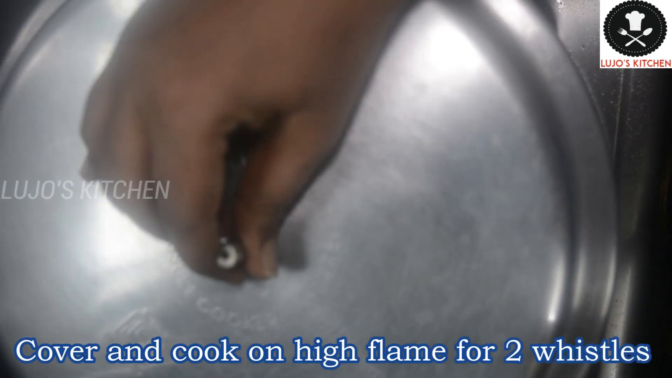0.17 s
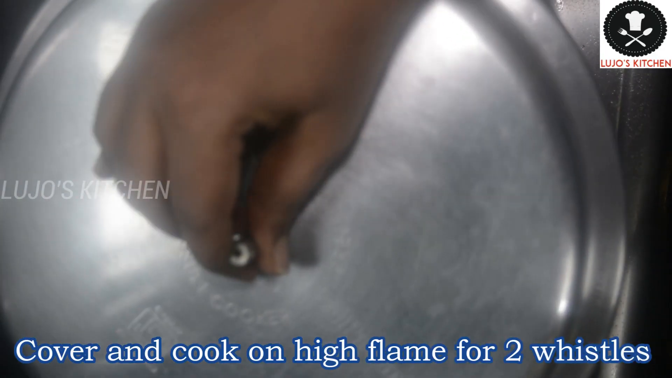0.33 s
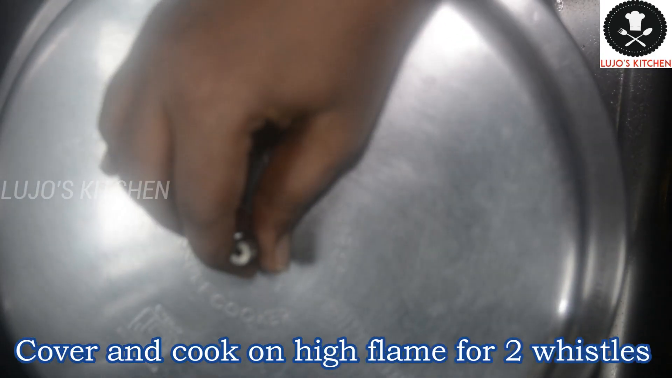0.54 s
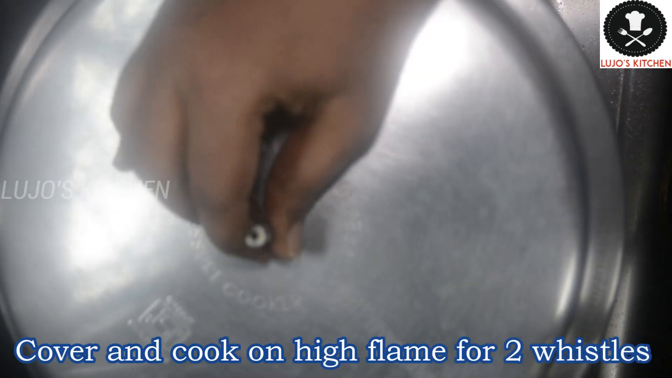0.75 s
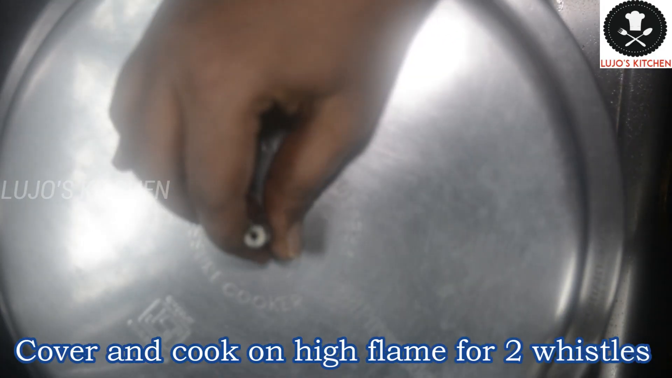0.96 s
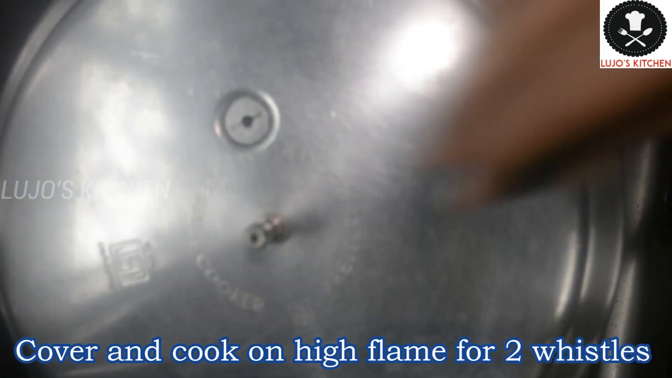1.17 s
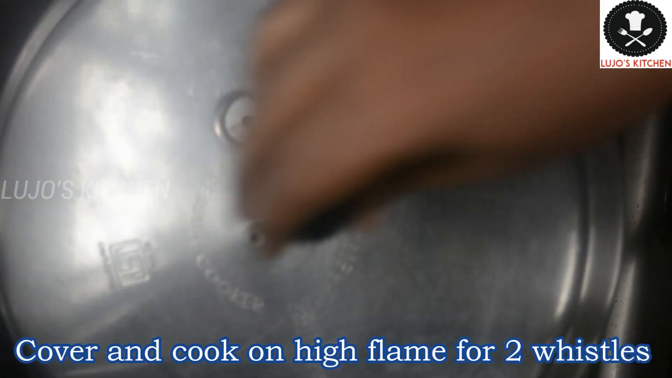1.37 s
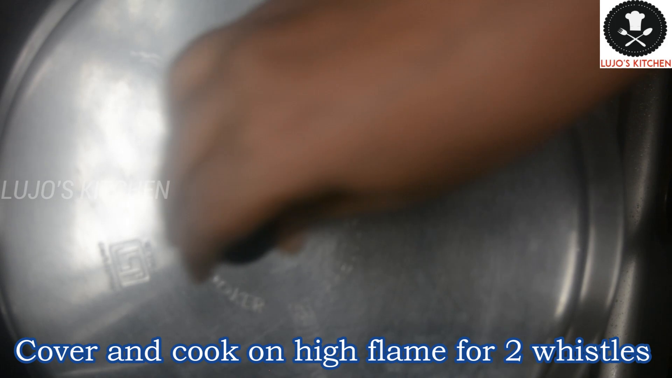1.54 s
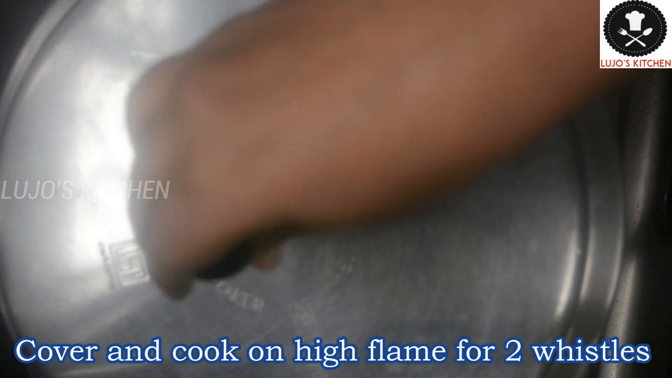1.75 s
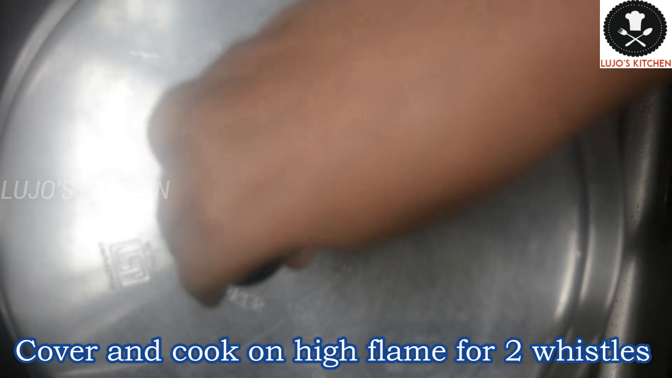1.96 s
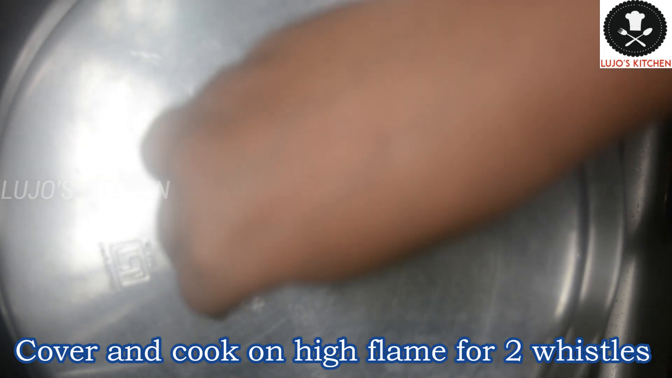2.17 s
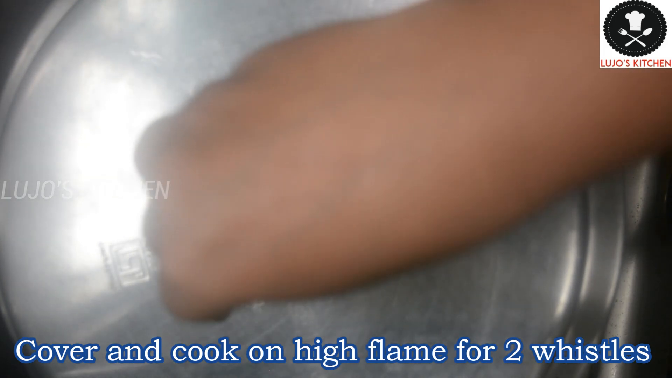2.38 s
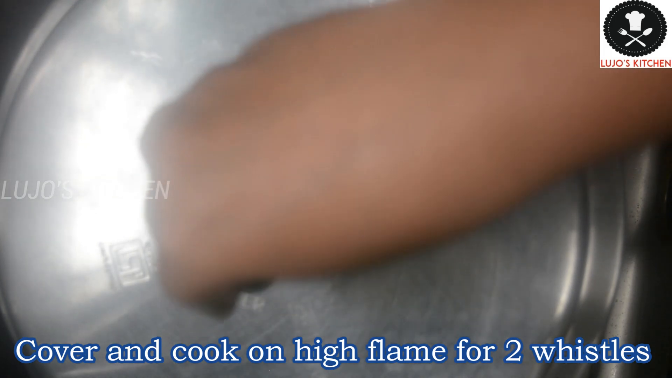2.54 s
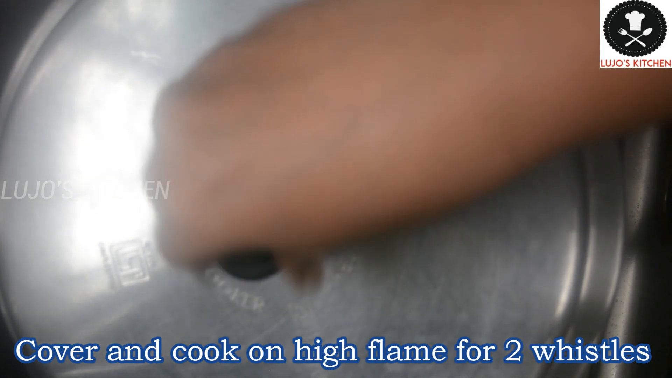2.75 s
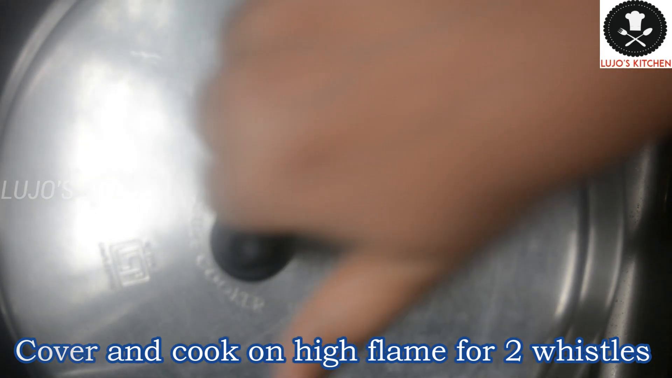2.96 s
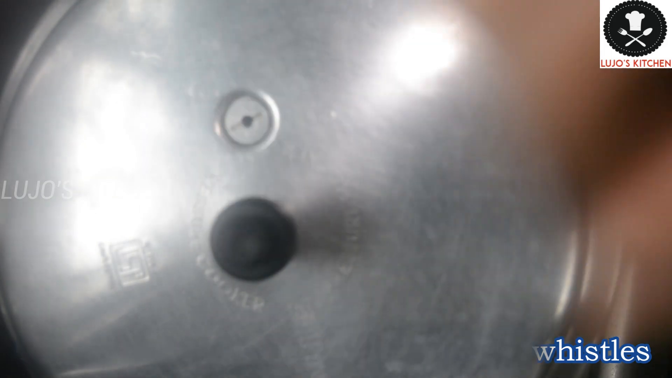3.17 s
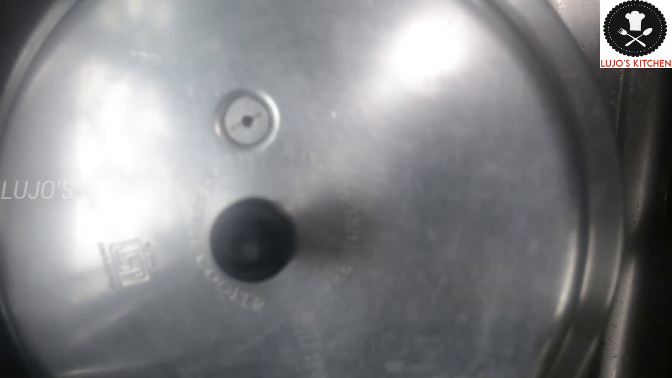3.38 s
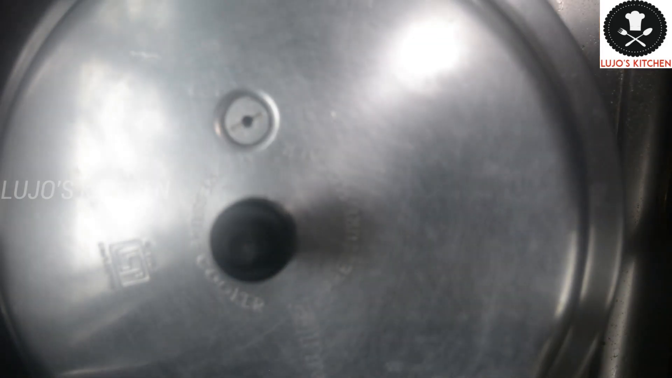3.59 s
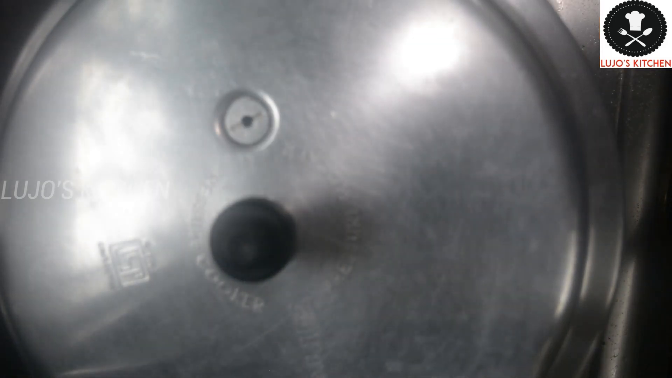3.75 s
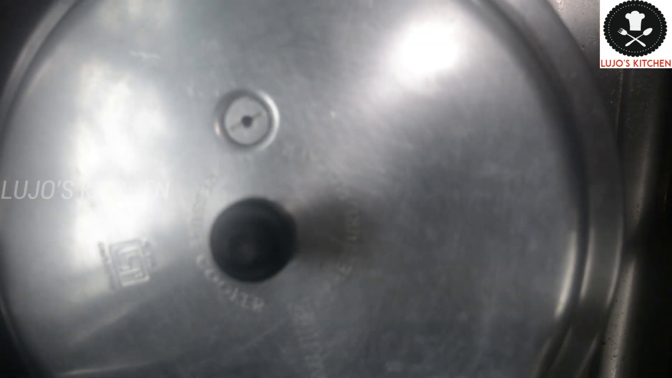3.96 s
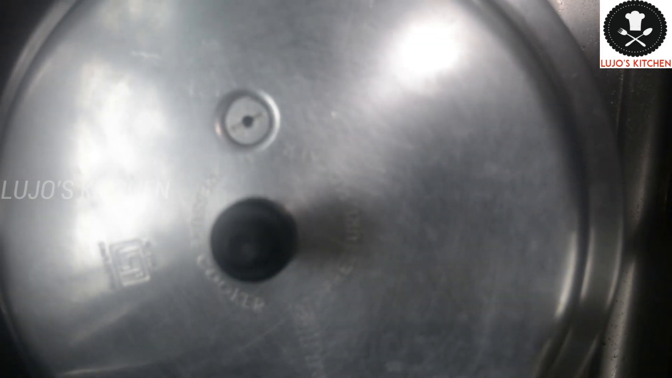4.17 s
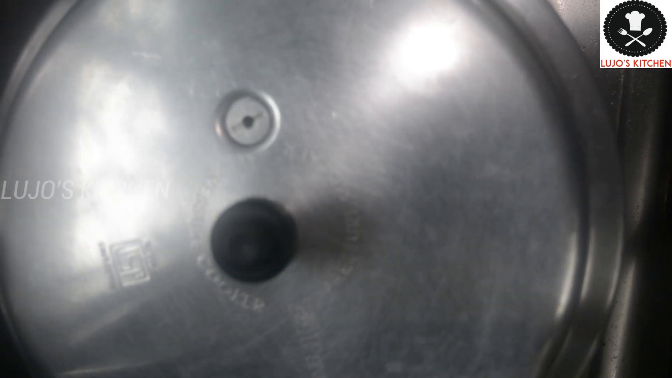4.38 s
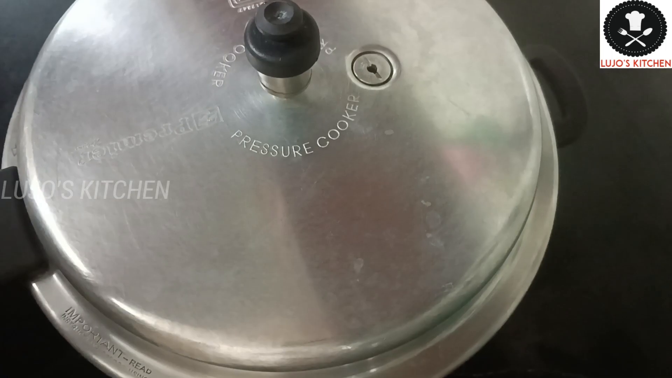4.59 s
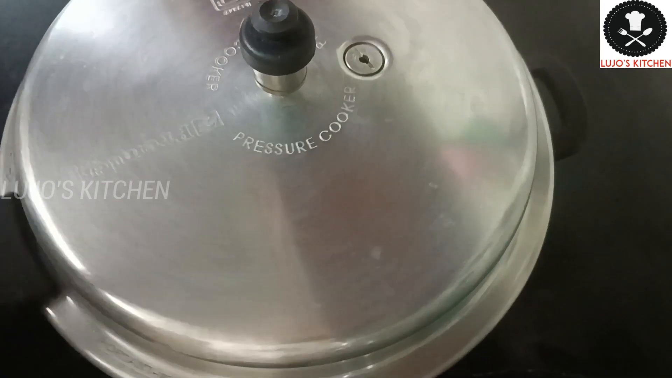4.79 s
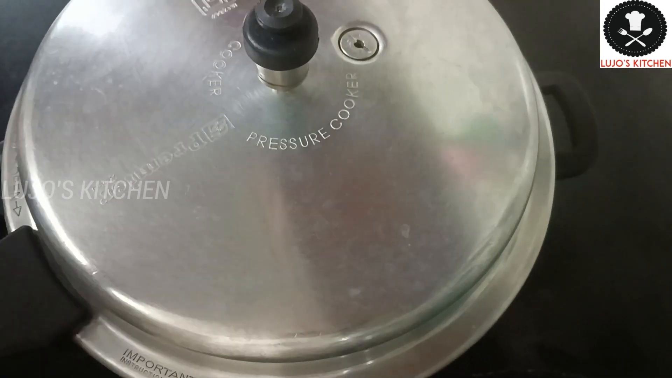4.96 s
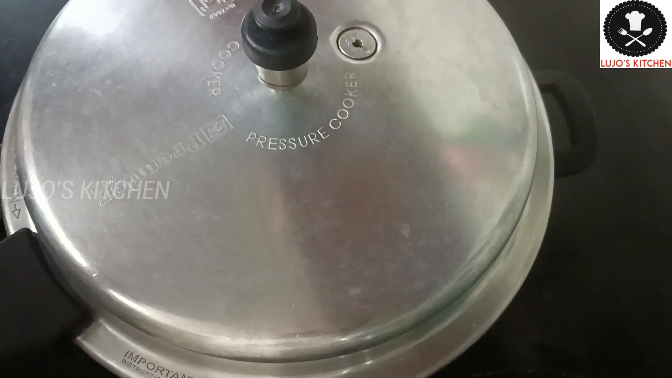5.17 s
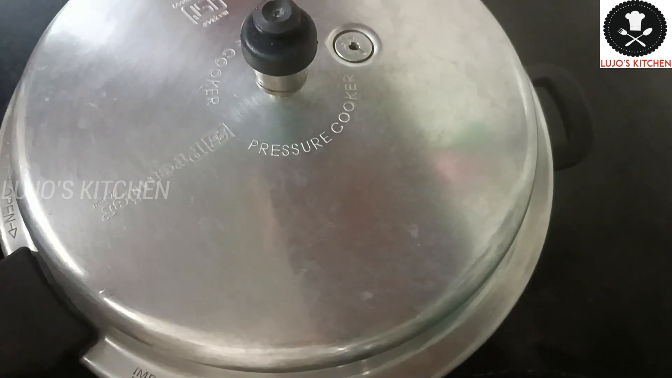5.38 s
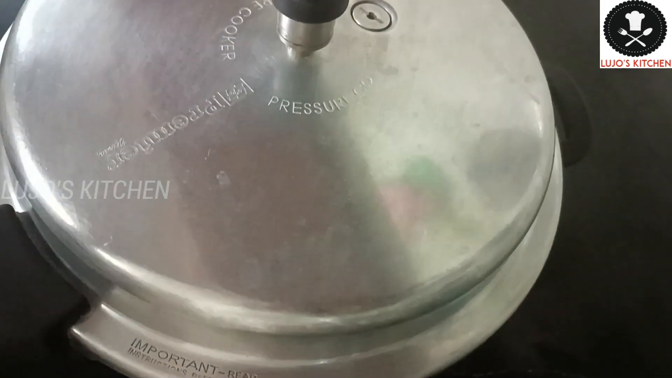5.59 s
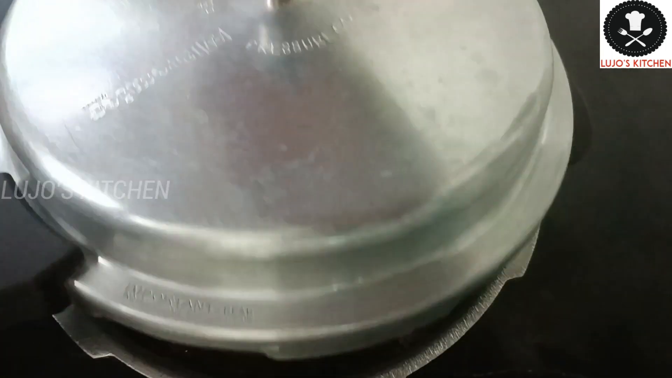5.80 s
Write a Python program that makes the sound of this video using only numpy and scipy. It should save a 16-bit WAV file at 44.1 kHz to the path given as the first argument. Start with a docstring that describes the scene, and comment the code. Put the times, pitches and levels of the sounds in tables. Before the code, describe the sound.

Close up in a kitchen, a hand knocks a gasket-damped metal lid while a far vehicle horn honks twice. A steel weight taps the vent tube, slides down with a hollow scrape, snaps home loudly and is spun with light rattles. Quiet air follows, then a brief total silence; afterwards a dry click, a short burst of steam and dull clacks of the loosened lid on the rim.

```python
"""Pressure cooker, close up

A hand knocks the lid about, slides the steel weight down the vent tube, snaps it home and spins it.
A horn sounds twice far outside; after a short silence the lid clicks, puffs steam and clacks on the rim.
Contacts are noise cracks plus decaying modes; rubbing is a hail of tiny contacts. Steam and air are
coloured noise, the horn and the whine wavering sines."""
import sys
import numpy as np
from scipy import signal
from scipy.io import wavfile
from scipy.ndimage import uniform_filter1d, map_coordinates

SR = 44100
rng = np.random.default_rng(int(sys.argv[2]) if len(sys.argv) > 2 else 0)


def to_wav(s):
    """Save 16-bit WAV."""
    ch = np.atleast_2d(s).T  # columns
    pcm = np.round(np.clip(ch, -1, 1) * 32767)  # PCM
    wavfile.write(sys.argv[1], SR, pcm.astype(np.int16))


N = 257086
TAPS = 4096
TIME, HZ = np.arange(N) / SR, np.fft.rfftfreq(TAPS, 1 / SR)
RING_TIME = TIME[:SR]  # a contact rings out within a second

# clustered modes of the steel fittings, and gaps: (centre [Hz], width [Hz], relative gain [dB])
FITTING_CLUSTERS = [(2530, 260, 1), (3830, 140, 2.5), (4440, 310, -1.5), (5900, 200, -5), (6250, 320, 8.5),
                    (7860, 1100, -2.5), (9600, 430, 9.5), (13200, 180, 10.5), (14440, 200, 5.5)]
# rim, dense higher modes: (frequency [Hz], relative level [dB])
RIM_SPECTRUM = [(47, -48), (80, -12.5), (307, -10), (678, -10.5), (1130, -7), (1370, -11), (1530, -11),
                (2660, -20), (3170, -12.5), (4610, -28.5), (6280, -23), (7330, -30.5), (15500, -40)]
# rim, clear modes: (frequency [Hz], relative level [dB], t60 [s])
RIM_CLEAR_MODES = [(307, -1.5, 0.27), (777, 1.5, 0.12), (906, 8, 0.074), (1373, 11, 0.22),
                   (3070, -2.5, 0.27), (3250, -4.5, 0.22), (4150, -7, 0.25), (5230, -0.5, 0.21),
                   (6300, 0.5, 0.16)]


def amp(db):
    """Decibels to gain."""
    return 10 ** (np.asarray(db) / 20)


def evened(x):
    """Scales to rms 1."""
    return x / np.sqrt(np.mean(x ** 2) + 1e-20)


def read(points, hz=HZ):
    """Interpolates a spectrum table on a log-frequency axis."""
    f, value = np.transpose(points)
    return np.interp(np.log(hz + 1), np.log(f + 1), value)


def humps(rows):
    """Gain in dB of broad resonances and gaps."""
    return sum(db * np.exp(-((HZ - hz) / width_hz) ** 2) for hz, width_hz, db in rows)


def add(mix, s, sound):
    """Mixes a sound in at time s."""
    start = round(s * SR)
    sound = sound[max(-start, 0):]
    part = mix[max(start, 0):][:len(sound)]
    part += sound[:len(part)]


def tint(x, db):
    """Causal minimum-phase filter with the gain db over HZ."""
    log_gain = np.log(amp(np.maximum(db, db.max() - 100)))
    mirrored = np.r_[log_gain, log_gain[-2:0:-1]]
    response = np.fft.ifft(np.exp(signal.hilbert(mirrored).conj())).real
    return signal.fftconvolve(x, response[:TAPS // 2])[:len(x)]


def drift(hz):
    """Random wander of rms 1, low-passed at hz."""
    lowpass = signal.butter(2, hz, fs=SR, output="sos")
    return evened(signal.sosfilt(lowpass, rng.standard_normal(N)))


def swell(start_s, rise_s, hold_s, release_s):
    """Gain that rises to 1, holds and dies away, rounded towards its top."""
    edge_db, bend = 39, 1.276  # drop at the start of the rise and the end of the release
    before = np.maximum(1 - (TIME - start_s) / rise_s, 0)
    after = np.maximum((TIME - start_s - rise_s - hold_s) / release_s, 0)
    return amp(-edge_db * np.minimum(before + after, 10) ** bend)


def ring(body_db, modes, mode_db, crack_t60, room_db):
    """One contact: a short crack of dense modes, the kitchen's tail, and the part's clear modes."""
    # kitchen decay: (frequency [Hz], t60 [s])
    room_t60 = [(100, 0.31), (400, 0.52), (1200, 0.45), (3500, 0.36), (7000, 0.37), (15000, 0.042)]
    detune = 0.004  # rms share by which each contact splits and shifts the modes
    t = RING_TIME
    hz, frame_s, z = signal.stft(rng.choice([-1., 1.], len(t)), SR, nperseg=256)
    fading = z * amp(-60 * frame_s / read(room_t60, hz)[:, None])
    tail = signal.istft(fading, SR, nperseg=256)[1][:len(t)]
    crack = rng.choice([-1., 1.], len(t)) * amp(-60 * t / crack_t60)
    dense = tint(crack + amp(room_db) * tail * (1 - np.exp(-t / 0.0025)), body_db)
    # each contact drives the modes with other signs and sizes, and splits each into a beating pair
    sizes = rng.choice([-1, 1], len(modes)) * amp(1.2 * rng.standard_normal(len(modes)))
    pairs = 1 + detune * rng.standard_normal((len(modes), 2, 1))
    clear = np.zeros(len(t))
    for size, pair, (f, db, t60) in zip(sizes, pairs, modes):
        clear += size * amp(db - 60 * t / t60) * np.sin(2 * np.pi * f * pair * t).sum(0)
    return evened(evened(dense) + amp(mode_db) * evened(clear))


def touch(thump_db, hard_db, bass_hz=480, treble_hz=5000, lowest_hz=90):
    """Gain over HZ: a heavy contact adds bass, a hard one treble."""
    bass = HZ ** 2 / (HZ ** 2 + lowest_hz ** 2) / (1 + (HZ / bass_hz) ** 4)
    return thump_db * bass + hard_db / (1 + (treble_hz / (HZ + 1)) ** 4)


def blows(rows, part, gain_db, firm_db, hard_db):
    """Single blows on one part: firm ones have its full hardness, lighter ones are duller."""
    dulling = 1.06  # dB of treble lost for each dB short of a firm blow
    out = np.zeros(N)
    for s, db, thump_db in rows:
        treble_db = hard_db - dulling * max(firm_db - db, 0)
        add(out, s, amp(db + gain_db) * tint(part(), touch(thump_db, treble_db)))
    return out


def rub(strokes, part, density_per_s, spread_db, tilt_db, chatter_db, chatter_hz=60, points=4):
    """Rubbing metal: a chattering hail of tiny contacts circles the part, brighter when pressed harder."""
    dulling = 0.63  # dB of treble lost for each dB that a stroke eases off
    circling_hz = 5
    sway_s, sway_hz = 0.00018, 7  # the modes sway as the contact moves: rms delay and rate
    force = sum(amp(db) * swell(*shape) for *shape, db, _ in strokes)
    bite = sum(amp(db + hard_db) * swell(*shape) ** (1 + dulling) for *shape, db, hard_db in strokes)
    highpass = signal.butter(2, 5000, "high", fs=SR, output="sos")
    chatter, out = chatter_db * drift(chatter_hz), np.zeros(N)
    for point in range(points):
        # nearness averages 1.5, so all points together make 1.5 x density_per_s contacts a second
        nearness = (1 + np.cos(2 * np.pi * (circling_hz * TIME + point / points))) ** 2
        sizes = rng.choice([-1, 1], N) * amp(chatter + spread_db * rng.random(N))
        contacts = evened((rng.random(N) < nearness * density_per_s / points / SR) * sizes)
        treble = signal.sosfiltfilt(highpass, contacts)
        pressed = (contacts - treble) * force + treble * bite
        out += signal.fftconvolve(pressed, part())[:N] / np.sqrt(points * SR)
    swayed = map_coordinates(out, [(TIME + sway_s * drift(sway_hz)) * SR], order=3)
    return tint(swayed, tilt_db / (1 + (2600 / (HZ + 1)) ** 6))


def metal(x, ripple_db):
    """A metal part's many high modes comb the treble, the same way for every contact."""
    comb = evened(uniform_filter1d(rng.standard_normal(len(HZ)), size=7))
    return tint(x, ripple_db * (np.clip(comb, -2, 2) - .5) / (1 + (3500 / (HZ + 1)) ** 4))


def weight_ring():
    """The steel weight, loose on its seat."""
    # dense higher modes: (frequency [Hz], relative level [dB])
    spectrum = [(60, -51.5), (170, -30), (260, -23.5), (450, -17.5), (660, -16.5), (950, -6.5),
                (1130, -6.5), (1370, -4), (1600, -11), (1970, -9.5), (2300, -17), (3500, -7), (4700, -18.5),
                (6400, -15), (7500, -22.5), (9700, -31), (15500, -50)]
    # clear modes: (frequency [Hz], relative level [dB], t60 [s])
    modes = [(923, -1, 0.23), (1025, 1, 0.24), (1235, -3, .28), (1298, 1, 0.28), (1390, -3, 0.31),
             (1975, -3, 0.24), (3060, -5, .28), (3275, -1, .42), (3385, -2, 0.5), (3451, -5, .36),
             (3630, 0, .25), (3822, -6, .27), (4205, -9, .28), (4447, -13, .28), (5380, -15, .3),
             (6366, -7, 0.34), (8113, -24, 0.3), (9690, -22, .38), (12510, -28, .38)]
    body_db = read(spectrum) + 1.3 * humps(FITTING_CLUSTERS)
    return ring(body_db, modes, mode_db=-3.5, crack_t60=0.04, room_db=-15.5)


def clinks(gain_db=-17.0, thump_db=-4):
    """Single blows of the weight on its seat: an edge strikes bright, a flat landing dull."""
    # (time [s], relative level [dB], treble hardness [dB])
    clink_rows = [(1.862, -27.5, -6), (1.869, -26.5, 5.5), (1.88, -28, 3), (2.214, -40.5, -21),
                  (2.579, -47, -31), (2.597, -20, 7.5), (2.602, -18.5, 15.5), (2.609, -14, -8),
                  (2.842, -50.5, 8), (2.889, -40.5, -18), (2.920, -42.5, -16), (2.951, -36, -13),
                  (3.026, -32.5, 2), (3.045, -34, -8), (3.186, -33, 0), (3.25, -43, -15),
                  (3.392, -48.5, -22)]
    out = np.zeros(N)
    for s, db, hard_db in clink_rows:
        add(out, s, amp(db + gain_db) * tint(weight_ring(), touch(thump_db, hard_db, treble_hz=7050)))
    return out


def spin():
    """The weight rubs as it settles, is turned slowly, spun, then nudged on and coasts to rest."""
    # (start [s], rise [s], hold [s], release [s], relative level [dB], treble hardness [dB])
    turns = [(2.62, 0.06, 0.035, 0.17, -46, 9.5), (2.73, 0.042, 0.28, 0.29, -44.5, -13.5),
             (2.974, 0.058, 0.05, 0.38, -32, -0.5), (3.11, 0.071, 0.018, 0.3, -34.5, -7.5)]
    return rub(turns, weight_ring, density_per_s=1100, spread_db=10, tilt_db=1, chatter_db=1.6, points=6)


def catch():
    """The weight is forced over the catch."""
    # (start [s], rise [s], hold [s], release [s], relative level [dB], treble hardness [dB])
    stroke = [(2.558, 0.044, 0.0032, 0.02, -18.5, 6.5)]
    return rub(stroke, weight_ring, density_per_s=6300, spread_db=6, tilt_db=-2.0, chatter_db=1.5, points=2)


def vent_ring():
    """The vent tube, touched by the weight."""
    # dense higher modes: (frequency [Hz], relative level [dB])
    spectrum = [(100, -71), (270, -15), (370, -28.5), (640, -13.5), (920, -9.5), (1620, -11.5), (2090, -8),
                (2350, -16.5), (3100, -18), (3680, -5.5), (4700, -28.5), (6300, -26.5), (7400, -37),
                (15500, -72)]
    # clear modes: (frequency [Hz], relative level [dB], t60 [s])
    modes = [(919, 1.5, 0.23), (1186, -7, 0.17), (1360, -0.5, 0.14), (1950, -3.5, 0.15), (2060, 3.5, 0.23),
             (3680, 6.5, 0.23), (4400, -5.5, 0.26), (6440, -14, 0.24)]
    body_db = read(spectrum) + 1.7 * humps(FITTING_CLUSTERS)
    return ring(body_db, modes, mode_db=-0.5, crack_t60=.024, room_db=-17)


def vent_taps():
    """The weight taps the vent tube."""
    # (time [s], relative level [dB], bass thump [dB])
    tap_rows = [(1.588, -19.5, -15), (1.592, -25.5, -15.5), (1.616, -30.5, 7), (1.825, -44, -5),
                (1.841, -32, -19)]
    return blows(tap_rows, vent_ring, gain_db=-18.5, firm_db=-35, hard_db=-9)


def slide():
    """The weight slides down the tube and its hollow bore resonates."""
    # (start [s], rise [s], hold [s], release [s], relative level [dB], treble hardness [dB])
    stroke = [(1.738, 0.0525, 0.058, 0.016, -30.5, 3.5)]
    # bore resonances: (centre [Hz], width [Hz], gain [dB])
    bore = [(1240, 160, 12), (2650, 610, 11)]
    rubbing = rub(stroke, vent_ring, density_per_s=2400, spread_db=10.0, tilt_db=-9.0, chatter_db=0.5)
    return tint(rubbing, humps(bore))


def lid_ring():
    """The locked lid, damped by its gasket."""
    # dense higher modes: (frequency [Hz], relative level [dB])
    spectrum = [(50, -56), (170, -7.5), (220, -19), (270, -15.5), (480, -12), (800, -10), (1400, -14),
                (1850, -16), (2300, -18), (2850, -17.5), (3550, -9.5), (4150, -12), (5000, -24),
                (6400, -22.5), (15500, -51.5)]
    # clear modes: (frequency [Hz], relative level [dB], t60 [s])
    modes = [(273.8, 6.5, 0.35), (885, 11.5, 0.2), (1210, 2, 0.33), (1234, 2.5, 0.32), (1704, 5, 0.51),
             (1940, 9.5, 0.2), (3210, 4, 0.37), (3650, 13.5, 0.077), (3860, 9, 0.11), (4250, 4.5, 0.19)]
    body_db = read(spectrum) + 0.34 * humps(FITTING_CLUSTERS)
    return ring(body_db, modes, mode_db=-3.0, crack_t60=0.076, room_db=-8.5)


def lid_knocks():
    """The hand knocks the lid about."""
    # (time [s], relative level [dB], bass thump [dB])
    knock_rows = [(0.018, -42.5, 15), (0.044, -38.5, 11.5), (0.095, -41, 13), (0.131, -42.5, 10),
                  (0.208, -39.5, 11), (0.259, -25, 9.5), (0.616, -22, 4), (0.619, -22.5, -14),
                  (0.660, -29.5, -19), (0.688, -33.5, 6.5)]
    return blows(knock_rows, lid_ring, gain_db=-23.5, firm_db=-32.5, hard_db=1.0)


def scuff():
    """The hand drags the lid a little."""
    # (start [s], rise [s], hold [s], release [s], relative level [dB], treble hardness [dB])
    stroke = [(0.196, 0.0077, 0.067, .015, -42.5, 21.8)]
    return rub(stroke, lid_ring, density_per_s=800, spread_db=24.0, tilt_db=-21.0, chatter_db=0.5, points=2)


def rim_ring():
    """The loosened lid against the rim of the pot."""
    return ring(read(RIM_SPECTRUM), RIM_CLEAR_MODES, mode_db=3, crack_t60=0.085, room_db=-10.5)


def rim_clacks():
    """The loosened lid clacks on the rim."""
    # (time [s], relative level [dB], bass thump [dB])
    clack_rows = [(5.478, -54, 10), (5.525, -35.5, 6.5), (5.533, -35, 5.5), (5.748, -42, 9.5),
                  (5.759, -30, -36)]
    return blows(clack_rows, rim_ring, gain_db=-13.0, firm_db=-34.0, hard_db=1.5)


def lug_ring():
    """The lid's lugs: a short, dry click with hardly any ring."""
    return ring(read(RIM_SPECTRUM), RIM_CLEAR_MODES, mode_db=-26, crack_t60=0.14, room_db=-35)


def lug_clicks():
    """The locking lugs slip free."""
    # (time [s], relative level [dB], bass thump [dB])
    click_rows = [(4.878, -54.5, 12), (4.896, -34.5, -10.5)]
    return blows(click_rows, lug_ring, gain_db=-13.5, firm_db=-70, hard_db=-1.0)


def ticks(per_s):
    """Sparse random clicks, scaled to rms 1."""
    return evened((rng.random(N) < per_s / SR) * rng.uniform(-1.1, 1, N))


def steam(bright_db=-31, spits_per_s=900, spit_db=-3):
    """A burst of noise that spits droplets; the harder the steam flows, the more treble it has."""
    # seal breaks, pot empties, last wisp: (start [s], rise [s], hold [s], release [s], level [dB])
    puffs = [(4.963, 0.0016, 0.0077, 0.021, -26), (4.964, 0.015, 0.064, 0.42, -35.5),
             (5.312, 0.089, 0.029, 0.3, -59.5)]
    # jet colour: (frequency [Hz], relative level [dB])
    spectrum = [(47, -48), (80, -33), (114, -5.5), (185, -6.5), (220, -19.5), (498, -9), (1150, -6.5),
                (3600, -11), (4600, -20), (8200, -23.5), (9800, -35.5), (15500, -35)]
    flow = sum(amp(db) * swell(*shape) for *shape, db in puffs)
    spitting = rng.standard_normal(N) + amp(spit_db) * ticks(spits_per_s)
    jet = flow * evened(tint(spitting, read(spectrum)))
    treble = signal.sosfilt(signal.butter(1, 7000, "high", fs=SR, output="sos"), jet)
    return jet + treble * flow / amp(bright_db)


def thud(modes, attack_s=0.0014):
    """A softly starting ring of a few low modes."""
    t = RING_TIME
    tones = sum(amp(db - 60 * t / t60) * np.sin(2 * np.pi * hz * t) for hz, db, t60 in modes)
    return (1 - np.exp(-t / attack_s)) ** 2 * tones


def thuds():
    """The pot rocks and drops on its stand, the lid's dome drums, the weight knocks on its seat."""
    # pot rocking: (time [s], level [dB])
    rocks = [(0.273, -45.5), (0.671, -40), (2.601, -46.5), (4.893, -38.5), (5.480, -42.5)]
    # stand: (frequency [Hz], relative level [dB], t60 [s])
    stand_modes = [(80, 3, 0.08), (118, -4.5, 0.57)]
    # dome, pitch set by how it is held: (time [s], level [dB], pitch [Hz], overtone relative level [dB])
    drums = [(0.016, -36, 333, -10), (0.094, -46, 330, 7), (0.212, -36.5, 272, -14),
             (5.527, -32.5, 240, -19), (5.639, -43.5, 315, -15), (5.748, -29.5, 309, 1)]
    drum_t60, overtone_ratio, overtone_t60 = 0.18, 1.31, 0.13  # s, times the pitch, s
    # dead bump of the pot dropping back: (frequency [Hz], level [dB], t60 [s])
    bump_modes = [(76.6, -31, 0.07)]
    # hollow knock of the weight landing: (frequency [Hz], level [dB], t60 [s])
    seat_modes = [(170, -49, 0.36), (949, -14, 0.16), (1010, -20, 0.17)]
    bump_s, seat_s = 0.675, 2.606
    out = np.zeros(N)
    for s, db in rocks:
        add(out, s, amp(db) * thud(stand_modes, attack_s=0.0044))
    for s, db, hz, overtone_db in drums:
        dome_modes = [(hz, 0, drum_t60), (hz * overtone_ratio, overtone_db, overtone_t60)]
        add(out, s, amp(db) * thud(dome_modes))
    add(out, bump_s, thud(bump_modes))
    add(out, seat_s, thud(seat_modes))
    return out


def horn(hz=417, waver=0.0091):
    """A far vehicle horn, its partials fluttering on the way through the street."""
    # harmonics from the fundamental up: (relative level [dB])
    partials_db = [-7, -1, -0.5, 0.5, -9, -10]
    # (start [s], hold [s], level [dB])
    honks = [(0.305, 0.18, -65), (0.858, 0.17, -65.5)]
    rise_s, release_s = 0.13, 0.13
    cycles = np.cumsum(hz * (1 + waver * drift(23.0))) / SR
    tone = np.zeros(N)
    for harmonic, db in enumerate(partials_db, 1):
        tone += amp(db + 3.5 * drift(16)) * np.sin(2 * np.pi * harmonic * cycles)
    gain = sum(amp(db) * swell(s, rise_s, hold_s, release_s) for s, hold_s, db in honks)
    return gain * evened(tone)


def whine(waver=0.00703, flutter_db=-1.0):
    """Thin, wavering tones in the air around the hot cooker."""
    # (frequency [Hz], level [dB])
    tones = [(2990, -68), (3420, -75)]
    out = np.zeros(N)
    for hz, db in tones:
        cycles = np.cumsum(hz * (1 + waver * drift(44.4))) / SR
        out += amp(db + flutter_db * drift(25)) * np.sin(2 * np.pi * cycles)
    return out


def hiss(spectrum, level_db):
    """Background: steady noise of one colour."""
    return amp(level_db) * evened(tint(rng.standard_normal(N), read(spectrum)))


def fitting():
    """The weight goes on; this part is heard in mono."""
    # kitchen air: (frequency [Hz], relative level [dB])
    early_air = [(15, -32), (25, -11), (173, -2.5), (227, -6.5), (368, -5.5), (469, -6), (1020, -8),
                 (2120, -14), (4040, -14.5), (5010, -22.5), (15500, -31)]
    contacts = lid_knocks() + vent_taps() + clinks() + scuff() + slide() + catch() + spin()
    return metal(contacts, ripple_db=4.0) + horn() + hiss(early_air, level_db=-64.5)


def opening():
    """The lid is worked loose and the last steam leaves."""
    # background: air with a low rumble: (frequency [Hz], relative level [dB])
    late_background = [(25, -47), (92, -4), (175, -8), (240, -26), (320, -15.5), (700, -29.5), (2200, -25.5),
                       (2600, -35.5), (3800, -32), (4300, -43), (15500, -56)]
    contacts = metal(lug_clicks() + rim_clacks(), ripple_db=1.0)
    return contacts + steam() + whine() + hiss(late_background, level_db=-57.5)


def two_ports(direct, diffuse, lag_s=0.0002, balance_db=-0.7):
    """Two microphone ports share part of the sound; it reaches the left one first."""
    # left-right likeness: (frequency [Hz], share [0-1])
    likeness = [(100, 1), (500, 0.67), (1500, 0.49), (5000, 0.036)]
    same = np.clip(read(likeness), .05, .97)
    right = tint(direct, 20 * np.log10(same)) + tint(diffuse, 10 * np.log10(1 - same ** 2))
    return np.array([direct * amp(balance_db), np.roll(right, round(lag_s * SR)) * amp(-balance_db)])


def scene():
    """Fitting the weight in mono, a silent pause, opening the lid in stereo; thuds in the centre."""
    # silence: (start [s], end [s])
    pause_start_s, pause_end_s = (4.46, 4.58)
    before = np.clip((pause_start_s - TIME) / .01, 0, 1)
    after = np.clip((TIME - pause_end_s) / .002, 0, 1)
    return before * fitting() + after * two_ports(opening(), opening()) + thuds()


def record(dry):
    """The recorder rounds off the very highest peaks, then limits the band."""
    edge_hz = 16000
    rounded = dry / (1 + (dry / .88) ** 6) ** (1 / 6)
    lowpass = signal.firwin(301, edge_hz, window=("kaiser", 9), fs=SR)
    return signal.oaconvolve(rounded, lowpass[None], "same", axes=1)


dry = scene()
out = record(dry)
to_wav(out)
```